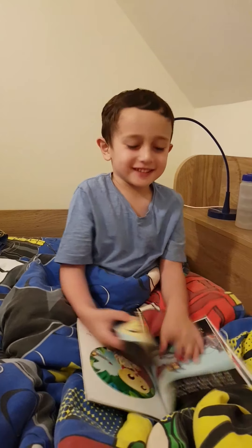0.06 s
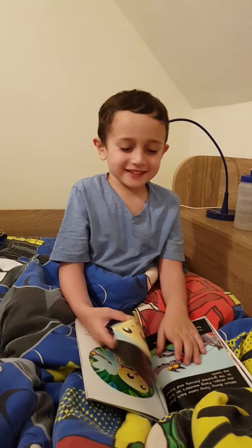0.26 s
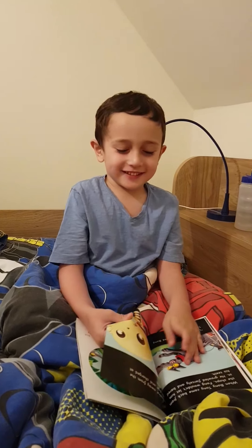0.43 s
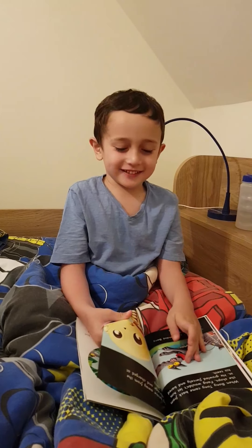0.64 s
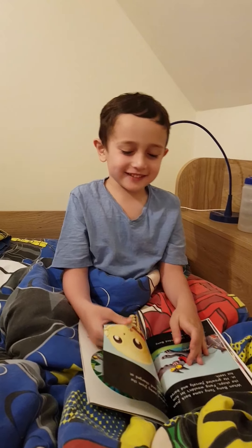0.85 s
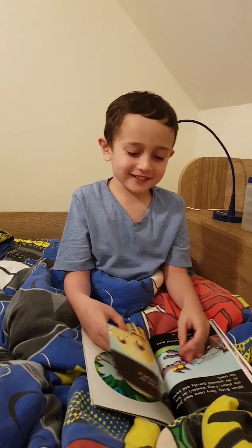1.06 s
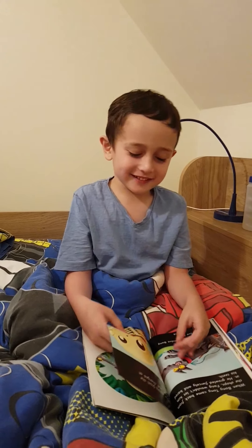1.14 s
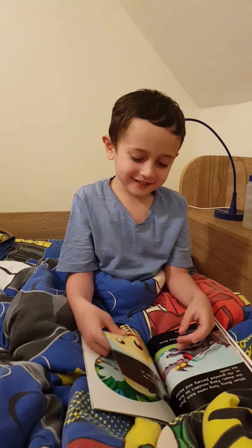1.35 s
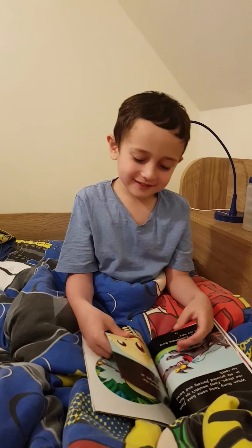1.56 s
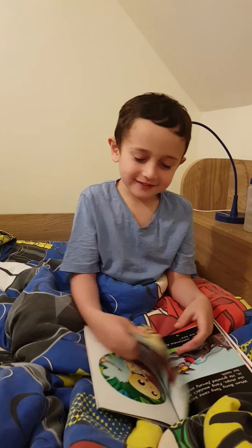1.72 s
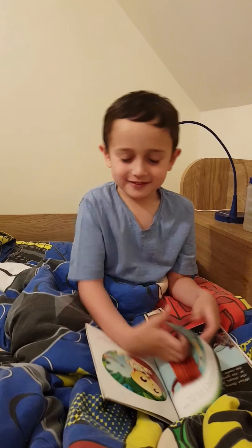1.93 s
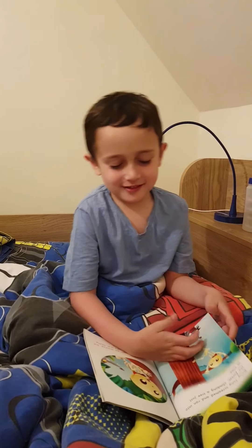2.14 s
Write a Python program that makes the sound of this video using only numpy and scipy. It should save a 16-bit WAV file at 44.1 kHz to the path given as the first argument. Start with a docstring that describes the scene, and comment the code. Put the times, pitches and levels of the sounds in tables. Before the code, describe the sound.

Paper page of a picture book: a turned page settles, fingers rub and buckle the next sheet with small snaps, then it sweeps over in quick crisp swishes; small quiet bedroom, close stereo microphone, faint hiss.

```python
"""Fingers rub a page over faint room hiss while the last page settles; a child leafs through a picture book.
The next page lifts, buckles in small snaps and sings under a fingertip, then sweeps over and lands.
Rubs, swipes and drags are random friction grains, snaps are clicks; filters give them the page's resonances.
Flexes are grains through a low resonance; bumps on the bedding are decaying low sines.
A near wall, scatter and a short tail of the small bedroom follow the page sounds."""
import sys
import numpy as np
from scipy import signal
from scipy.fft import rfft, irfft
from scipy.io import wavfile

SR = 44100
rng = np.random.default_rng(int(sys.argv[2]) if len(sys.argv) > 2 else 0)


def file_out(sig):
    """Save sig as 16-bit WAV at sys.argv[1]."""
    # one column per channel
    cols = np.atleast_2d(sig).T
    # limit, then scale
    lim = np.clip(cols, -1, 1)
    pcm = np.round(lim * 32767).astype(np.int16)
    wavfile.write(sys.argv[1], SR, pcm)


N = 96138
TIME_S = np.arange(N) / SR
FILTER_HZ = np.fft.rfftfreq(4096, 1 / SR)

# Finger pressure on the page: t/s, level/dB
RUB_LEVEL = [(0, -49), (.06, -47.5), (.11, -57.5), (.15, -60), (.23, -70), (.26, -56), (.31, -62.5),
             (.36, -52.5), (.42, -52.5), (.55, -53), (.68, -55.5), (.77, -51.5), (.83, -47.5), (.92, -52.5),
             (1, -60), (1.14, -59), (1.21, -58), (1.27, -47.5), (1.35, -49.5), (1.43, -60.5), (1.52, -46),
             (1.66, -58), (2.08, -64), (2.18, -69.5)]
# Room hiss: t/s, level/dB
HISS_LEVEL = [(0, -51), (.12, -47.5), (.2, -61), (.235, -57), (.26, -55.5), (1, -53), (1.6, -55),
              (2.18, -52)]
# Buckles of the bent sheet: t/s, level/dB, body/dB, middle/dB, treble/dB
SNAPS = [(0.019, -41.5, -2, -4, 22.5), (0.057, -12, 0, 0, -35), (0.0803, -7.5, -2.5, -2.5, -7),
         (0.2448, -21.5, -1, -16, -0.5), (0.4009, -13.5, 5, -5, 0), (0.4411, -3.5, 3.5, -4.5, -3),
         (0.4822, 1.5, 0.5, -8, -7.5), (0.5823, -4.5, 8, -10.5, -5), (.7361, -24, 11, 4, 2),
         (0.7851, -6, 5, 0.5, 4), (0.8165, -9, 6, 1, -3), (0.845, -14, 6.5, -9, -17),
         (0.9004, -16, -2, 8.5, 4.5), (1.0507, -17.5, -2.5, -5, -32), (1.225, -25, 3, 15.5, 17.5),
         (1.304, -15, -1, 8.5, -0.5), (1.3367, -7.5, -4.5, 3.5, -22), (1.3837, -16, 4, 4.5, -5.5),
         (1.4551, -4, -9, -0.5, -15.5), (1.4995, 0, -2.5, 4, -6), (1.558, -4, 2.5, 8.5, -5),
         (1.5658, -7, -1, 9, 4.5), (1.67, -1, 5.5, 4, 0), (1.6906, -3, 3.5, -1, 1),
         (1.842, -7.5, -10, 6.5, -6), (1.853, -17.5, 18.5, -42, 16), (1.9705, -8, 4, 10, 17),
         (2.0152, -5.5, 3, 14.5, 2.5)]
# Page block flexes and pushes air: peak t/s, rise/s, fall/s, level/dB, f/Hz
FLEXES = [(.024, 0.018, 0.025, -56.5, 210), (0.031, 0.042, 0.012, -62.5, 420),
          (0.806, 0.036, 0.042, -67.5, 376), (1.23, 0.024, 0.015, -72.5, 240),
          (1.335, 0.027, 0.033, -62.5, 251), (1.5, .01, 0.028, -66.5, 222),
          (1.564, 0.0048, 0.011, -61, 231), (1.691, 0.011, 0.014, -66, 262),
          (1.859, 0.017, 0.012, -58, 190), (1.92, 0.012, 0.011, -54, 234), (2.015, 0.011, 0.011, -55, 216)]
# Page slides over neighbours and hand: peak t/s, rise/s, fall/s, level/dB, body/dB, middle/dB, treble/dB
SWIPES = [(.03, 0.044, 0.046, -45.5, 11, -20, -23), (1.703, 0.021, 0.06, -44.5, 6, 10.5, -2),
          (1.735, .008, 0.0032, -28, -30, -23, -12.5), (1.755, 0.0017, 0.0015, -23, 9.5, 4.5, -5),
          (1.7614, 0.0059, 0.0016, -33, -9, 11, 7.5), (1.844, 0.018, 0.053, -38.5, -9, -5, -4),
          (1.896, 0.025, 0.03, -29, -5.5, 3.5, -6), (1.8982, 0.002, 0.00085, -27, 8.5, -7, 12),
          (1.921, .008, 0.0086, -35, 9, -12, -24), (1.9715, 0.0045, 0.0016, -35.5, 14.5, 20, 0.5),
          (2.0151, 0.0038, 0.0015, -21, 5.5, 12, -18.5), (2.03, 0.06, 0.031, -41, -1, 9.5, -4.5),
          (2.057, 0.0052, 0.011, -46, -6, 14.5, 0.5)]
# Book bumps on the bedding: t/s, level/dB
BUMPS = [(0.064, -57), (.445, -50.5), (0.483, -44.5), (0.588, -49.5), (.83, -85), (1.601, -55),
         (1.738, -56.5), (1.902, -54.5), (2.004, -63)]
# Fingertip drag on the bowed page: t/s, level/dB
DRAG_LEVEL = [(.22, -92), (.255, -78), (.3, -77), (.345, -60.5), (.385, -62.5), (.42, -65), (.5, -69),
              (.6, -65.5), (.66, -81), (.86, -67), (1, -86.5), (1.3, -73), (1.5, -87)]
# Broad colours of the sources: f/Hz, gain/dB
RUB_COLOUR = [(40, 1), (130, -12.5), (250, -3), (450, -13.5), (650, -11.5), (950, -12), (1400, -10),
              (2400, -7.5), (3300, -13), (5000, -14.5), (8500, -16.5), (14000, -19)]
HISS_COLOUR = [(20, -6), (45, -6), (75, 4), (110, -6), (300, -20.5), (900, -38.5), (1500, -22.5),
               (2600, -3.5), (3300, -39), (5000, -12.5), (8500, -23), (12000, -10.5), (15000, -14)]
SNAP_COLOUR = [(40, -9), (130, -22.5), (250, -19), (400, -24), (650, -13), (950, -15.5), (1400, -7),
               (2200, -7.5), (3000, -17), (4500, -15.5), (7000, -20), (9000, -25.5), (14000, -29)]
SWIPE_COLOUR = [(40, -34.5), (120, -17), (220, -7), (360, -24.5), (650, -10), (1000, -10), (1500, -11.5),
                (2700, -12.5), (5000, -5.5), (7500, -4.5), (9500, -10.5), (14000, -9.5)]
# Resonances of bowed page and book: f/Hz, full width/Hz, lift/dB
PAGE_MODES = [(536, 114, 9), (820, 290, 0), (1294, 148, 10), (1782, 230, 6), (2354, 300, 4),
              (2920, 264, 4.5), (4310, 500, 2)]
# Parts of the sheet radiating from different places: left lead/s, level/dB
SHEET_PARTS = [(0.000262, -1.5), (0.000176, -2.5)]
# Room decay: f/Hz, T60/s
ROOM_T60 = [(100, 0.1), (500, 0.23), (1500, 0.2), (5000, 0.17), (15000, 0.067)]
# Microphone colour: f/Hz, left minus right/dB
BALANCE = [(60, -3.6), (200, -4), (330, .5), (750, 1), (1050, -4), (1300, -6), (1800, -3.5), (2700, -.5),
           (4200, -4), (6400, -4.5), (9800, -.5), (13000, -5)]

RUB_GRAINS_PER_S, FINGER_SPREAD_DB = 1700, 2.5
SLIDE_GRAINS_PER_S, SLIDE_SPREAD_DB = 7000, 5.5
CRACKLE_NORM, CRACKLE_FALL_S = .55, .0012  # norm relative to the click
FLEX_HALF_WIDTH_HZ = 96
BUMP_CENTRE_HZ, BUMP_RISE_S, BUMP_FALL_S = 66, .006, .028
DRAG_HZ, DRAG_HALF_WIDTH_HZ, DRAG_GRAINS_PER_S = 1335, 130, 1400
DIRECT_DB, LEFT_LEAD_S, MIC_SPACING_M = -1.5, .00027, .14
WALL_DELAY_S, WALL_DB, WALL_LEFT_LEAD_S = .003, 3.0, .0002
WALL_LOW_CUT_HZ, WALL_HIGH_CUT_HZ = 850, 9000
EARLY_DB, EARLY_FALL_S, TAIL_DB = -2.0, .004, -4.5
LOW_CUT_HZ, HIGH_CUT_HZ = 42, 15650


def amp(db):
    """Decibels to gain."""
    return 10 ** (np.asarray(db) / 20)


def read(points, hz):
    """Interpolates a table on a log-frequency axis."""
    f, value = np.transpose(points)
    return np.interp(np.log(hz + 1), np.log(f), value)


def level(points):
    """Gain over time from a table of levels, linear in dB."""
    return amp(np.interp(TIME_S, *np.transpose(points)))


def add(mix, s, sound):
    """Adds a sound to the mix at time s, trimming both ends."""
    at = round(s * SR)
    sound = sound[max(-at, 0):]
    part = mix[max(at, 0):][:len(sound)]
    part += sound[:len(part)]


def tint(x, db):
    """Minimum-phase filter with gains db on FILTER_HZ."""
    log_gain = np.log(amp(np.r_[db, db[-2:0:-1]]))
    spectrum = np.exp(np.conj(signal.hilbert(log_gain)))
    taps = np.fft.ifft(spectrum).real
    return signal.fftconvolve(x, taps[:len(FILTER_HZ)])


def ring(x, hz, half_width_hz):
    """Passes x through one resonance, keeping the power of a white input."""
    gain = 1 / (1 + ((FILTER_HZ - hz) / half_width_hz) ** 2) + amp(-70)
    return tint(x, 20 * np.log10(gain / np.sqrt(np.mean(gain ** 2))))


def paper(colour, body_db=0, middle_db=0, treble_db=0):
    """Page gains in dB: broad colour, resonances and the tone of one touch."""
    touch = [(330, 0), (560, body_db), (780, body_db), (1050, 0), (1450, 0),
             (1850, middle_db), (2600, middle_db), (4800, treble_db)]
    modes = sum(lift / (1 + (2 * (FILTER_HZ - hz) / width) ** 2) for hz, width, lift in PAGE_MODES)
    return read(colour, FILTER_HZ) + read(touch, FILTER_HZ) + modes


def grains(size, per_s, spread_db):
    """Tiny stick-slip clicks of uneven strength and random sign, rms 1."""
    chance, strength, sign = rng.random((3, size))
    hit = chance < per_s / SR
    gain = amp(spread_db * np.minimum(-np.log(1 - strength), 4))
    x = hit * gain * np.sign(sign - .5)
    return x / np.sqrt(np.mean(x ** 2) + 1e-12)


def stroke(rise_s, fall_s):
    """Friction grains that swell and die away; returns start relative to the peak, and sound."""
    t = TIME_S[:16384] - TIME_S[6000]
    swell = np.exp(-abs(t) / np.where(t < 0, rise_s, fall_s))
    return t[0], swell * grains(len(t), SLIDE_GRAINS_PER_S, SLIDE_SPREAD_DB)


def diffuse(size):
    """Noise from all sides at two microphones: alike in the bass, unrelated in the treble."""
    a, b = rfft(rng.standard_normal((2, size)))
    same = np.sinc(2 * np.fft.rfftfreq(size, 1 / SR) * MIC_SPACING_M / 343)  # speed of sound in m/s
    return irfft(np.array([a, same * a + np.sqrt(1 - same ** 2) * b]), size)


def rubbing():
    """Fingertips creep over the page in sparse friction grains."""
    rub = level(RUB_LEVEL) * grains(N, RUB_GRAINS_PER_S, FINGER_SPREAD_DB)
    return tint(rub, paper(RUB_COLOUR))[:N]


def hiss():
    """Faint hiss and low rumble of the quiet room: coloured diffuse noise."""
    colour = read(HISS_COLOUR, FILTER_HZ)
    sides = np.array([tint(side, colour)[:N] for side in diffuse(N)])
    return level(HISS_LEVEL) * sides


def snaps():
    """Each buckle is one sharp click with a brief crackle that rings the page."""
    out, t = np.zeros(N), TIME_S[:1024]
    for s, db, *tone in SNAPS:
        click = grains(len(t), SLIDE_GRAINS_PER_S, SLIDE_SPREAD_DB) * np.exp(-t / CRACKLE_FALL_S)
        click *= CRACKLE_NORM / np.linalg.norm(click)
        click[0] += 1
        add(out, s, amp(db) * tint(click, paper(SNAP_COLOUR, *tone)))
    return out


def flexes():
    """Low, hollow flutter: friction strokes through a resonance of the flexing book."""
    out = np.zeros(N)
    for s, rise_s, fall_s, db, hz in FLEXES:
        start_s, push = stroke(rise_s, fall_s)
        add(out, s + start_s, amp(db) * ring(push, hz, FLEX_HALF_WIDTH_HZ))
    return out


def swipes():
    """Sliding paper: dense friction grains swell, fade and ring the page."""
    out = np.zeros(N)
    for s, rise_s, fall_s, db, *tone in SWIPES:
        start_s, slide = stroke(rise_s, fall_s)
        add(out, s + start_s, amp(db) * tint(slide, paper(SWIPE_COLOUR, *tone)))
    return out


def bumps():
    """Soft thuds of the book on the quilt: decaying low sines of varied pitch."""
    out, t = np.zeros(N), TIME_S[:12000]
    envelope = (1 - np.exp(-t / BUMP_RISE_S)) * np.exp(-t / BUMP_FALL_S)
    for s, db in BUMPS:
        hz = BUMP_CENTRE_HZ * rng.uniform(.75, 1.25)
        add(out, s, amp(db) * envelope * np.sin(2 * np.pi * hz * t))
    return out


def drag():
    """Stick-slip of a fingertip keeps one page resonance ringing."""
    friction = level(DRAG_LEVEL) * grains(N, DRAG_GRAINS_PER_S, FINGER_SPREAD_DB)
    return ring(friction, DRAG_HZ, DRAG_HALF_WIDTH_HZ)[:N]


def bedroom(x, left_lead_s):
    """Direct sound, a strong, thin near-wall bounce, furniture scatter and a short tail."""
    t = TIME_S[:16384]
    late = np.maximum(t - WALL_DELAY_S, 0)
    # tail: noise decaying at its own rate in each band
    hz, frame_s, bands = signal.stft(diffuse(len(t)), SR, nperseg=256)
    decay = amp(-60 * frame_s / read(ROOM_T60, hz)[:, None])
    tail = signal.istft(bands * decay, SR, nperseg=256)[1][:, :len(t)] * (late > 0)
    early = diffuse(len(t)) * np.exp(-late / EARLY_FALL_S) * (late > 0)
    echo = amp(TAIL_DB) * tail / np.linalg.norm(tail[0])
    echo += amp(EARLY_DB) * early / np.linalg.norm(early[0])
    # direct and wall paths; the right side lags
    f, right = np.fft.rfftfreq(len(t), 1 / SR), np.array([[0], [1]])
    direct = amp(DIRECT_DB) * np.exp(-2j * np.pi * f * right * left_lead_s)
    wall = amp(WALL_DB) * np.exp(-2j * np.pi * f * (WALL_DELAY_S + right * WALL_LEFT_LEAD_S))
    wall = wall / (1 + 1j * f / WALL_HIGH_CUT_HZ)
    wall = wall * 1j * f / (WALL_LOW_CUT_HZ + 1j * f)
    paths = irfft(direct + wall) * (t < t[-1] / 2)  # drops wrapped pre-ringing
    return signal.fftconvolve(x[None], echo + paths, axes=1)[:, :N]


def scene():
    """Page sounds in the bedroom, plus bumps and hiss without added room sound."""
    friction = sum(amp(db) * bedroom(rubbing() + swipes(), lead_s) for lead_s, db in SHEET_PARTS)
    page = bedroom(snaps() + flexes() + drag(), LEFT_LEAD_S)
    return friction + page + bumps() + hiss()


def record(dry):
    """Each microphone has its own colour; then low cut and band limit."""
    size = N + 4096
    tilt_db = read(BALANCE, np.fft.rfftfreq(size, 1 / SR)) / 2
    heard = irfft(rfft(dry, size) * amp([tilt_db, -tilt_db]), size)[:, :N]
    low_cut = signal.butter(3, LOW_CUT_HZ, "high", fs=SR, output="sos")
    heard = signal.sosfilt(low_cut, heard)
    band_limit = signal.firwin(255, HIGH_CUT_HZ, window=("kaiser", 9), fs=SR)
    return signal.oaconvolve(heard, band_limit[None], "same")


dry = scene()
out = record(dry)
file_out(out)
```